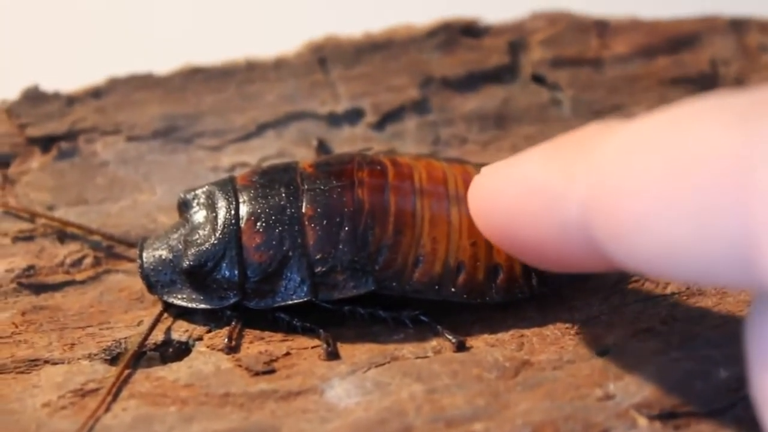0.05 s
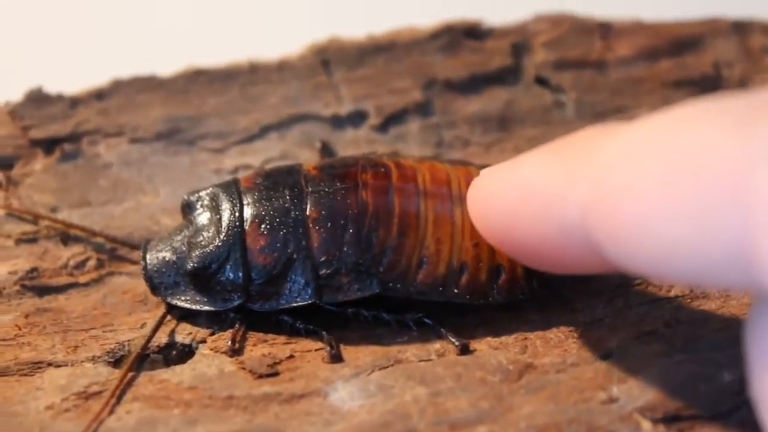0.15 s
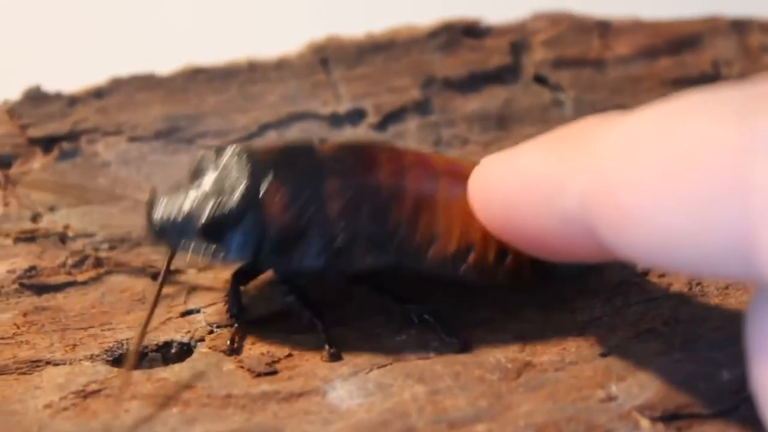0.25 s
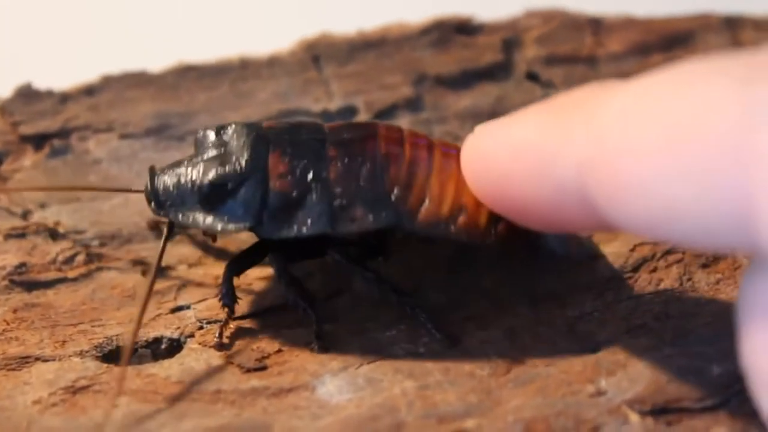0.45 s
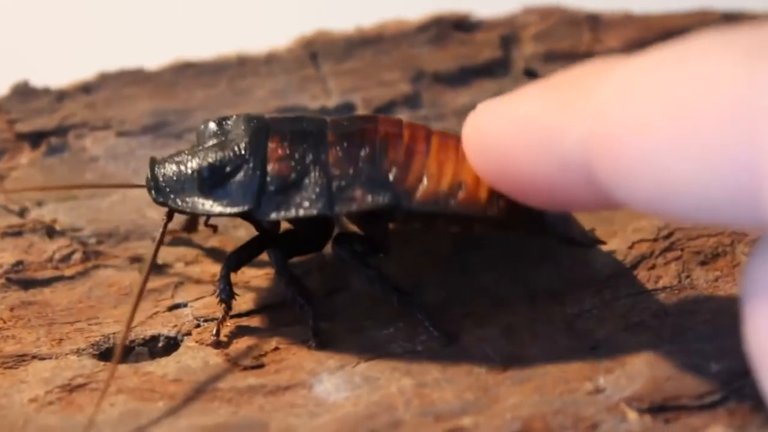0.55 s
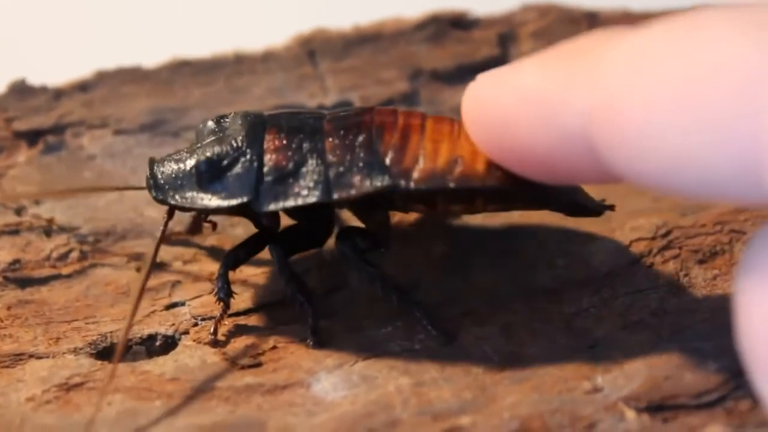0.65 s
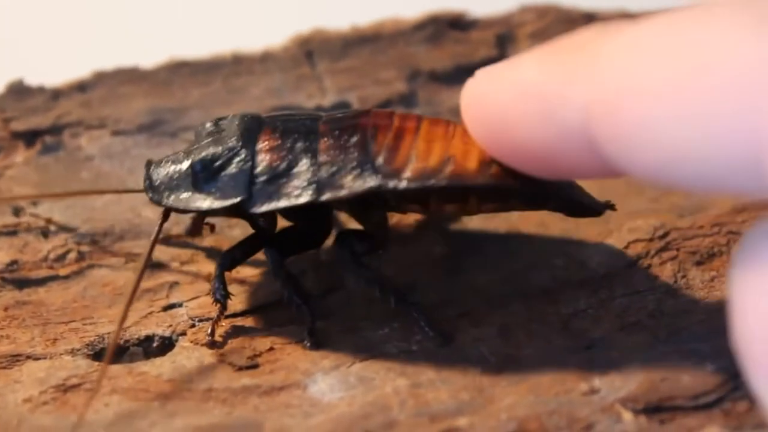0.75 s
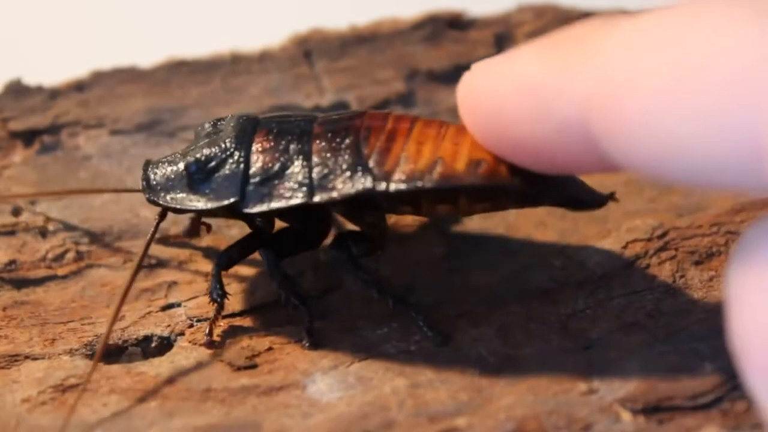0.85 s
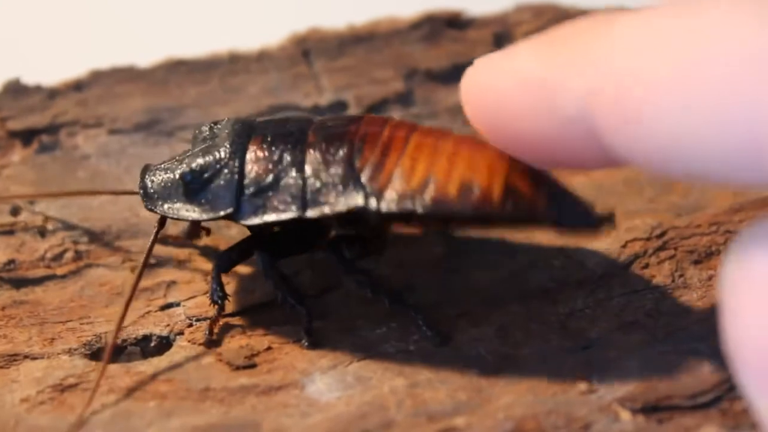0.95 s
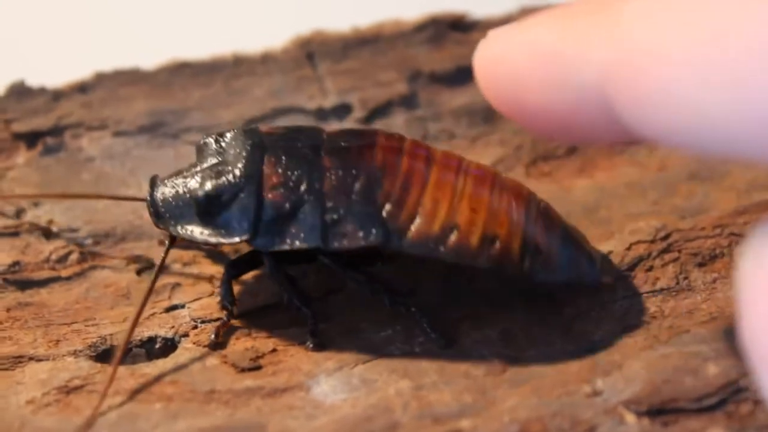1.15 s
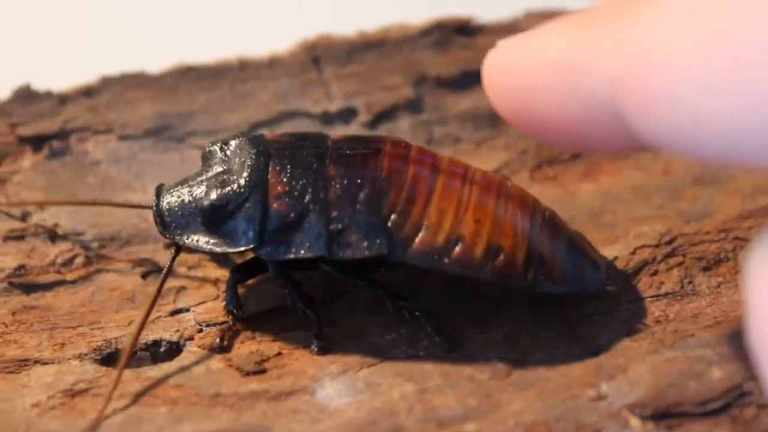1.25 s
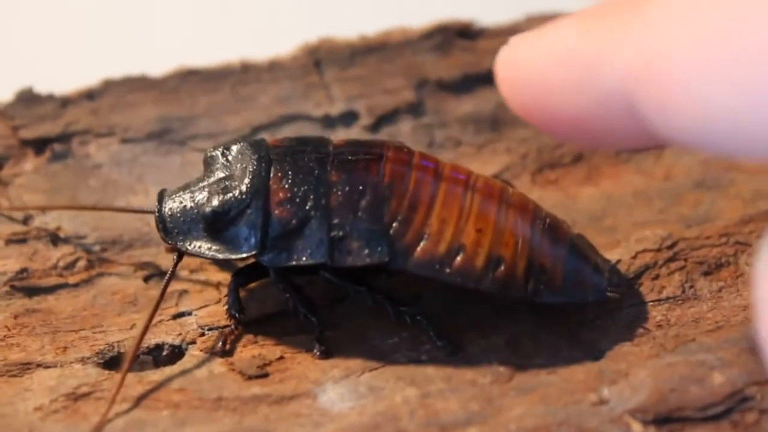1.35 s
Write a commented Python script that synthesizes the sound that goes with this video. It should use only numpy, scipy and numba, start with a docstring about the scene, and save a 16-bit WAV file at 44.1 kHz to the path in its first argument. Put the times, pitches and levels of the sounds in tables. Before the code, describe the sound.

One sharp, close insect hiss with a rough whistle, against a quiet room hum.

```python
"""A hissing cockroach close to the microphone, in a small room where a machine hums and throbs behind it.
Poked by a finger, at 0.2 s it forces one long hiss out through its spiracles, and the room answers briefly.
Over a broad rush the air jet sings a rough whistle that rises with the pressure and sags as it runs out.
The insect shifts on the bark with soft bumps; the last air leaves with a lower "shoo" before 0.9 s.
From about 1.1 s a few faint high squeaks sound in the background."""
import sys
import numpy as np
from scipy import signal
from scipy.fft import rfft, irfft
from scipy.io import wavfile
from scipy.ndimage import uniform_filter1d
from numba import njit

SR = 44100
rng = np.random.default_rng(int(sys.argv[2]) if len(sys.argv) > 2 else 0)


def unload_audio(sound):
    """Save the sound as a 16-bit wav file, at the path given as the first command line argument."""
    columns = np.transpose(np.atleast_2d(sound))
    # keep every value between -1 and 1, then stretch to whole-number steps
    steps = np.round(np.clip(columns, -1, 1) * 32767)
    wavfile.write(sys.argv[1], SR, steps.astype(np.int16))


N = 61739

# The background air of the room. Each row: frequency in Hz, relative level in dB.
AIR_SPECTRUM = [(25, -39.5), (43, -17), (64, -13.5), (86, -12.5), (122, -10), (160, -8.5), (280, -4.5),
                (400, -11.5), (650, -13.5), (1000, -12.5), (1530, -16), (2300, -15), (4040, -25),
                (5430, -31.5), (9500, -36), (15500, -41)]
# A faint, steady high hiss, different in left and right, above about 4.5 kHz.
# Each row: frequency in Hz, filter gain in dB.
STEADY_HISS_FILTER = [(3800, -70.5), (4800, -6), (15000, -3.5)]
# The machine's steady hum. Each row: frequency in Hz, level in dB.
HUM_PARTIALS = [(53.8, -67.5), (118.8, -59), (215.3, -58), (264.5, -54.5), (323, -59.5), (349.9, -64.5)]
# Air flow through the spiracles. Each row: time in seconds, relative flow in dB.
SPIRACLE_FLOW = [(.19, -52), (.202, -14), (.213, -7), (.219, -1), (.232, -0.5), (.31, 0.5), (.45, -1),
                 (.55, -3.5), (.62, -5), (.71, -5.5), (.775, -10), (.81, -18), (.86, -22), (.885, -52)]
# The broad rush of the jet. Each row: frequency in Hz, relative level in dB.
RUSH_SPECTRUM = [(300, -26.5), (1000, -14.5), (1700, -8.5), (2600, -3), (4000, -3.5), (5800, -10.5),
                 (7500, 1.5), (9300, -1), (9950, -13), (11300, -2), (12400, -17.5), (13700, -11),
                 (15500, -14.5)]
# Resonances of the air tube and shell. Each row: centre in Hz, width in Hz, relative level in dB.
TUBE_MODES = [(3020, 520, -7), (4230, 560, -1), (5300, 500, -4), (6500, 260, 0), (7400, 500, 6),
              (8600, 400, 3), (10400, 550, 0), (13900, 1100, -7), (15300, 450, -4)]
# Added stereo noise near 5 kHz and above 11 kHz that swells with the hiss.
# Each row: frequency in Hz, filter gain in dB.
STEREO_NOISE_FILTER = [(3300, -78), (4100, -29.5), (4800, -3.5), (5900, -10.5), (6700, -26.5), (7600, -45),
                       (9900, -27.5), (11000, -2.5), (15500, -7.5)]
# The colour of the room's answer. Each row: frequency in Hz, gain in dB.
REVERB_COLOUR = [(3000, 5.5), (8000, -6), (11000, 5.5), (14000, -4.5)]
# The jet's whistle. Each row: time in seconds, pitch in Hz, level in dB, core over skirt in dB.
WHISTLE_PATH = [(.214, 6600, -57, -5.5), (.219, 7250, -19.5, -5), (.236, 7800, -15.5, 0),
                (.262, 8300, -14, -7.5), (.29, 8670, -15, -1.5), (.36, 8700, -15.5, -4.5),
                (.46, 8540, -17, -3), (.545, 8550, -17, 1), (.6, 8050, -19.5, -0.5),
                (.655, 7600, -22.5, -5), (.715, 7300, -25, -5.5), (.745, 7050, -36.5, -17),
                (.79, 7000, -59, -20)]
# How the shell colours the whistle. Each row: frequency in Hz, gain in dB.
SHELL_COLOUR = [(5800, -3), (7300, 1), (8100, -1), (8650, 1), (9200, -5), (9900, -9)]
# Bumps on the bark. Each row: start in seconds, level in dB.
BARK_BUMPS = [(0.332, -40), (.385, -50), (0.471, -44), (.705, -43)]
# The last air. Each row: peak time and half-length in seconds, centre and width in Hz, level in dB.
LAST_PUFFS = [(0.701, 0.055, 5800, 1200, -35.5), (.768, 0.055, 4180, 845, -39)]
# Background squeaks. Each row: start and length in seconds, pitch and width in Hz, level in dB.
FAINT_SQUEAKS = [(1.084, 0.16, 4100, 452, -59), (1.18, .12, 2823, 90.5, -59), (1.214, .19, 2280, 34.6, -55)]


def undb(db):
    """Decibels to gain."""
    return 10 ** (np.asarray(db) / 20)


def unit(x):
    """Scale to rms 1."""
    return x / np.sqrt(np.mean(x ** 2))


def noise():
    """White noise."""
    return rng.standard_normal(N)


def curve(table, column=1):
    """One column of a table, joined by straight lines in time."""
    rows = np.array(table)
    return np.interp(np.arange(N) / SR, rows[:, 0], rows[:, column])


def drift(per_s):
    """Smooth random drift with rms 1."""
    hold = max(int(SR / per_s), 1)
    steps = np.repeat(rng.standard_normal(N // hold + 1), hold)
    return unit(uniform_filter1d(steps, hold)[:N])


def colour(x, points):
    """Filter by (Hz, dB) points."""
    hz, db = np.array(points).T
    bin_hz = np.maximum(np.arange(N // 2 + 1) * SR / N, 1)
    gain = undb(np.interp(np.log(bin_hz), np.log(hz), db))
    return irfft(rfft(x) * gain, N)


@njit
def bandpass(x, tuning, damping):
    """State-variable band-pass whose centre and width can move."""
    y, band_state, low_state = np.empty(len(x)), 0., 0.
    for i in range(len(x)):
        band = (band_state + tuning[i] * (x[i] - low_state)) / (1 + tuning[i] * (tuning[i] + damping[i]))
        band_state = 2 * band - band_state
        low_state += 2 * tuning[i] * band
        y[i] = damping[i] * band
    return y


def resonate(x, hz, width_hz):
    """A steep resonance (two band-passes in a row), output rms 1."""
    angle = 2 * np.pi * np.minimum(hz * np.ones(N), .45 * SR) / SR
    tuning = np.tan(angle / 2)
    damping = 2 * np.pi * width_hz / SR / np.sin(angle)
    return unit(bandpass(bandpass(x, tuning, damping), tuning, damping))


def room_air(level_db=-47.5):
    """The steady, dark noise of the room's air at the microphone."""
    return undb(level_db) * unit(colour(noise(), AIR_SPECTRUM))


def machine(knock_hz=26.87, scatter_db=2.5):
    """In the background, knocks of uneven strength ring a casing, over hum and a soft fan-like band."""
    t = np.arange(N) / SR
    knock_count = np.floor(t * knock_hz + rng.random())
    knocks = np.maximum(np.diff(knock_count, append=0), 0) * undb(scatter_db * drift(knock_hz))
    hum = sum(undb(db) * np.sqrt(2) * np.sin(2 * np.pi * (hz * t + rng.random()))
              for hz, db in HUM_PARTIALS)
    casing = undb(-53) * resonate(knocks, hz=255, width_hz=140)
    fan = undb(-54.5) * resonate(noise(), hz=1154, width_hz=400)
    return casing + hum + fan


def rush(sizzle_rise_s=.023):
    """Turbulent air rings the tube; high resonances and sizzle grow steeply with the flow."""
    flow = undb(curve(SPIRACLE_FLOW))
    broad = undb(-33) * unit(colour(noise(), RUSH_SPECTRUM))
    tube = 0
    for hz, width_hz, db in TUBE_MODES:
        steepness = .566 + hz / 7200
        tube += undb(db - 34.5) * flow ** steepness * resonate(noise(), hz, width_hz)
    sizzle = undb(-33) * resonate(noise(), hz=13000, width_hz=4400)
    valve_open_s = np.cumsum(flow > .5) / SR
    build_up = 1 - np.exp(-valve_open_s / sizzle_rise_s)
    return flow * broad + tube + build_up * flow ** 2.8 * sizzle


def room_reverb(x, t60_s=.28, gap_s=.004):
    """The small room's short diffuse tail reaches the microphone just after the direct sound."""
    t = np.arange(N) / SR
    tail = noise() * np.exp(-np.log(1000) * t / t60_s) * (t > gap_s)
    tail /= np.sqrt(np.sum(tail ** 2))
    return colour(signal.fftconvolve(x, tail)[:N], REVERB_COLOUR)


def whistle(wobble_share=.012, saturation=.5):
    """The jet's unsteady tone: a narrow core, a breathy skirt just under it and a weak octave on top."""
    flow = undb(curve(SPIRACLE_FLOW))
    hz = curve(WHISTLE_PATH, column=1) * (1 + wobble_share * drift(per_s=170))
    level = undb(curve(WHISTLE_PATH, column=2)) * np.minimum(10 * flow, 1)
    core_gain = undb(curve(WHISTLE_PATH, column=3))
    core = core_gain * resonate(noise(), hz, width_hz=300)
    spread = np.clip(flow, .3, 1) ** -.26  # weaker flow widens the skirt
    skirt = unit(resonate(noise(), .98 * hz, width_hz=1740 * spread) / np.sqrt(spread))
    jet = (core + skirt) / np.hypot(1, core_gain)
    swing = np.abs(signal.hilbert(jet))
    jet /= np.sqrt(1 + saturation * swing ** 2)  # the jet limits its own swings
    octave = undb(-14) * resonate(noise(), 2 * hz, width_hz=1700)
    return level * (unit(colour(jet, SHELL_COLOUR)) + octave)


def bark_bumps(hz=71.4, decay_s=.012):
    """Dull, quickly damped thuds as the insect shifts on the bark."""
    t, out = np.arange(N) / SR, 0
    for start, db in BARK_BUMPS:
        age = np.maximum(t - start, 0)
        out += undb(db) * np.exp(-age / decay_s) * np.sin(2 * np.pi * hz * age)
    return out


def last_air():
    """As the pressure drops, the jet falls onto lower resonances."""
    t, out = np.arange(N) / SR, 0
    for peak_s, half_length, hz, width_hz, db in LAST_PUFFS:
        swell = np.exp(-2 * ((t - peak_s) / half_length) ** 2)
        out += undb(db) * swell * resonate(noise(), hz, width_hz)
    return out


def squeaks(sag_hz_per_s=360):
    """Thin, breathy tones in the background that swell, sag a little and fade."""
    t, out = np.arange(N) / SR, 0
    for start, length, hz, width_hz, db in FAINT_SQUEAKS:
        age = np.clip(t - start, 0, length)
        swell = np.sqrt(np.abs(np.sin(np.pi * age / length)))
        out += undb(db) * swell * resonate(noise(), hz - sag_hz_per_s * age, width_hz)
    return out


def scene(flutter_db=.5):
    """The insect close to the microphone and the room behind, both central, with added stereo noise."""
    hiss = (whistle() + rush() + last_air()) * undb(flutter_db * drift(per_s=80))
    air = room_air()
    steady_high_hiss = colour(room_air(), STEADY_HISS_FILTER)
    mid = hiss + undb(-10) * room_reverb(hiss) + bark_bumps() + air + machine() + squeaks()
    swelling_stereo_noise = colour(rush(), STEREO_NOISE_FILTER)
    side = swelling_stereo_noise + steady_high_hiss
    return np.array([mid + side, mid - side])


def record(dry):
    """The recorder cuts the top steeply."""
    top_hz = 15700
    return signal.sosfilt(signal.ellip(12, .2, 80, top_hz, fs=SR, output="sos"), dry)


dry = scene()
out = record(dry)
unload_audio(out)
```